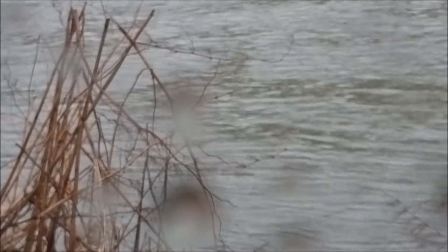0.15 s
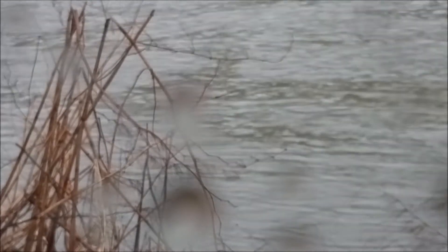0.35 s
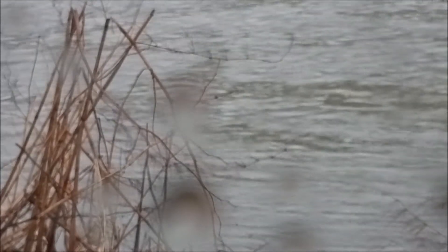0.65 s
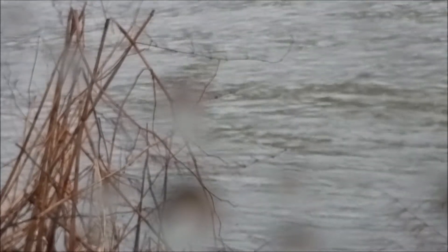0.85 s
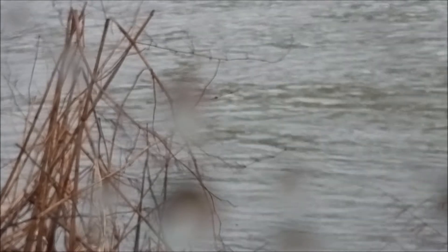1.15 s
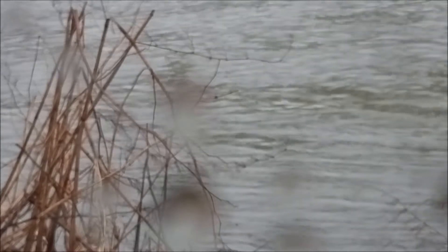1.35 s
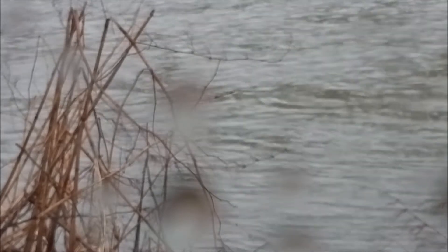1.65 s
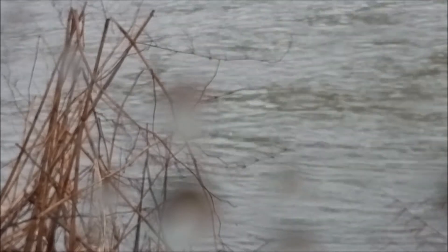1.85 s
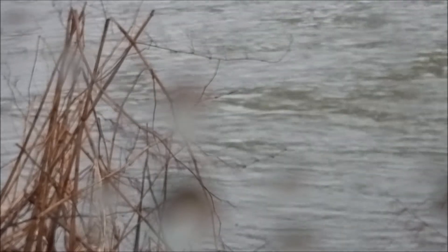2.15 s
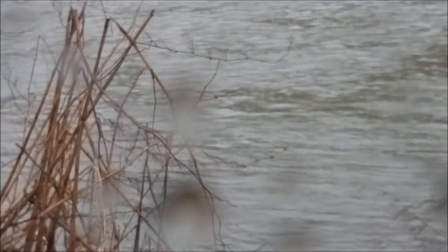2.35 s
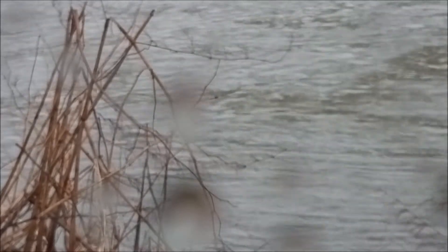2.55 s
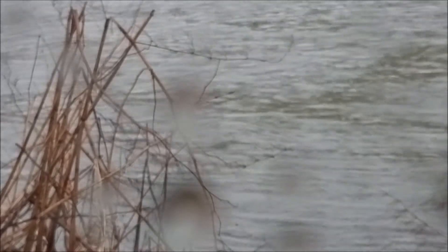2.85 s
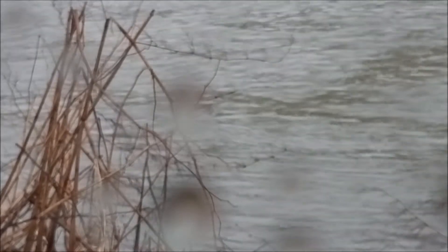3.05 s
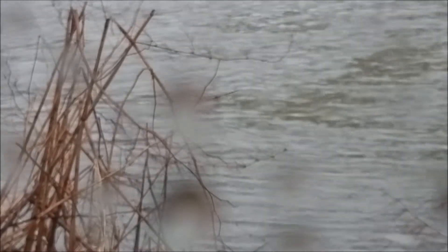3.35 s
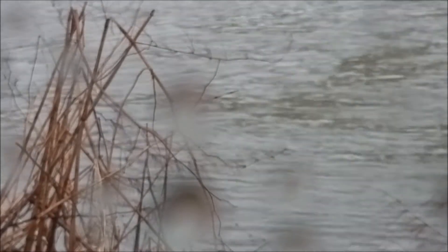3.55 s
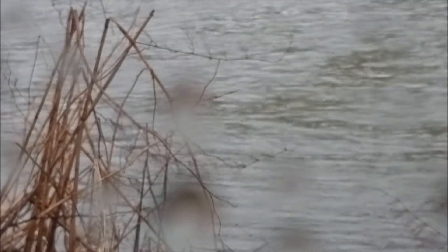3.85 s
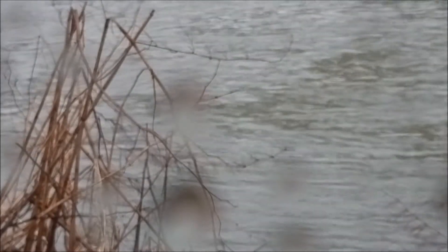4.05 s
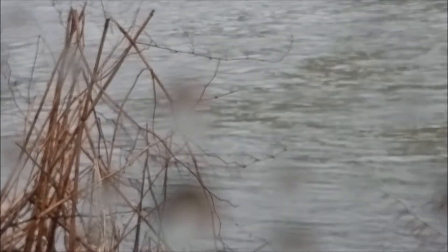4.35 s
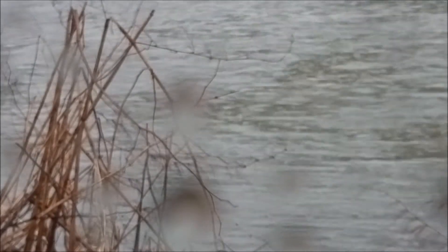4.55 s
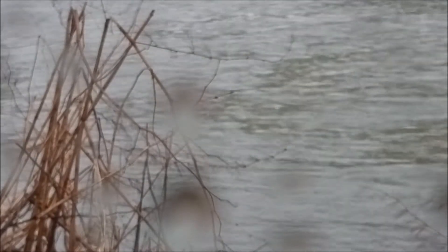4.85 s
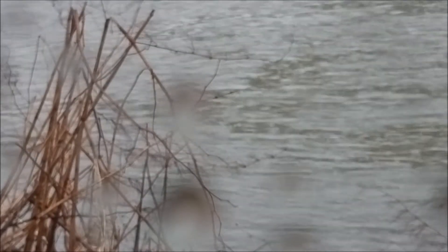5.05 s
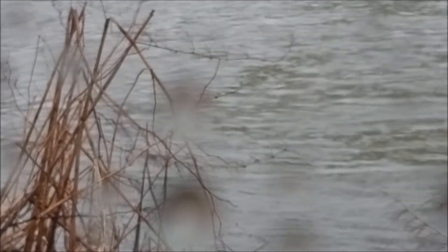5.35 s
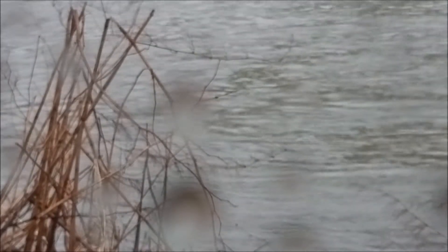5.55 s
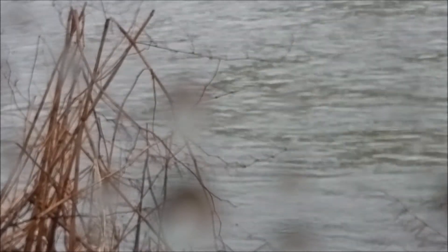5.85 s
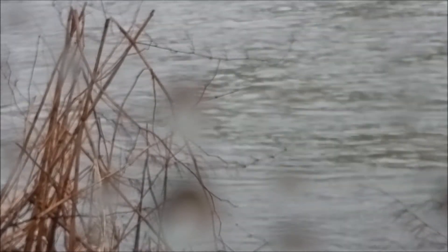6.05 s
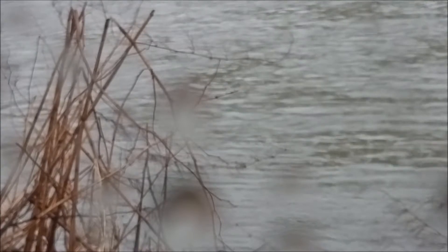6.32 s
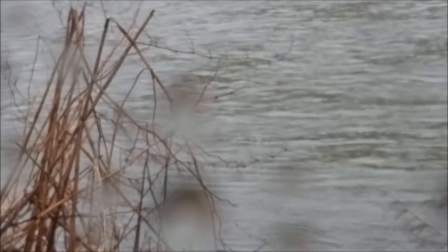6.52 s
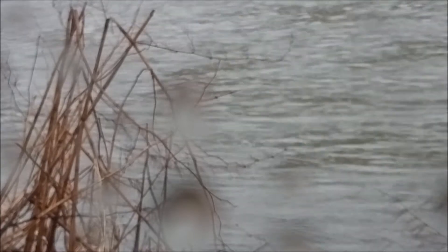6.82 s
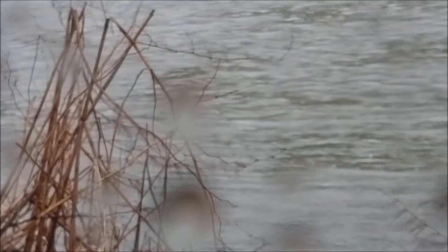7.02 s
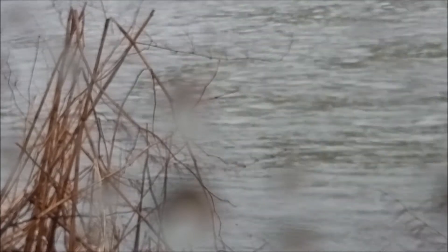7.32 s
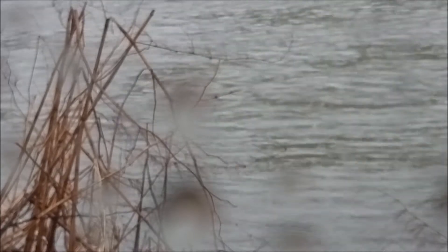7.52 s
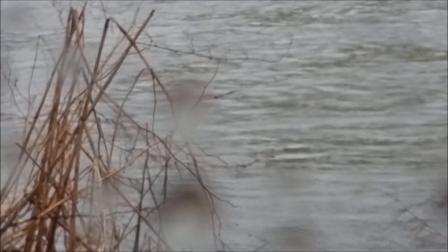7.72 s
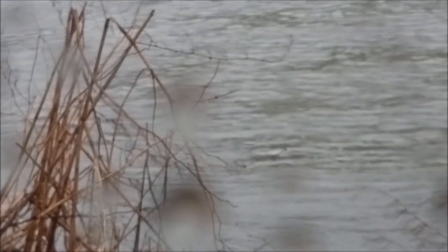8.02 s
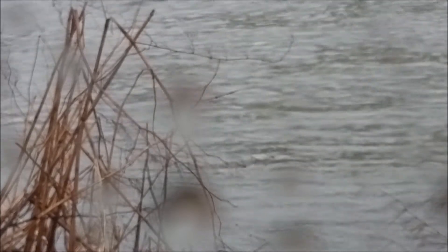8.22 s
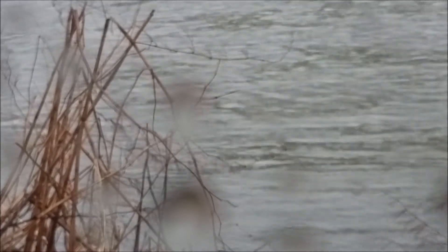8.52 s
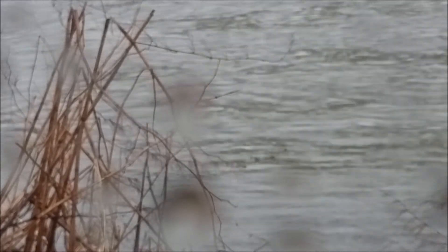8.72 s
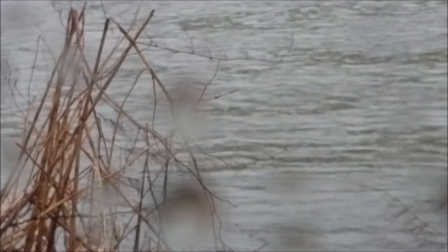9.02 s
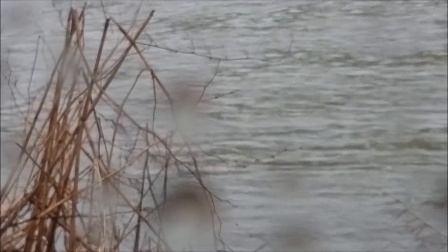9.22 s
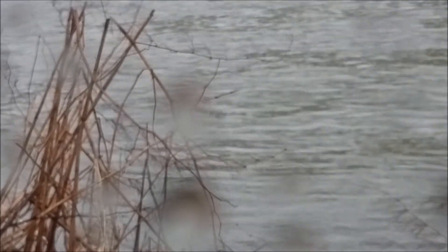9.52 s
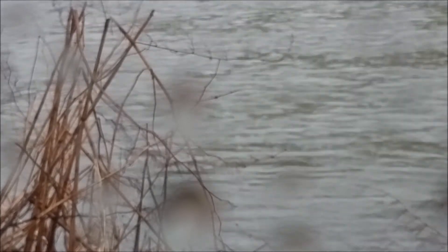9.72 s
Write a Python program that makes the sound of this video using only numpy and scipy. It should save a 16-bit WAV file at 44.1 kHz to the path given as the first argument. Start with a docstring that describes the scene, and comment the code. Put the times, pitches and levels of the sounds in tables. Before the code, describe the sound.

Steady rain patters on an umbrella just above a stereo microphone on a river bank. Hundreds of small drops blend into a dense, low drumming with a wet sizzle. Fat drips thump and splash, round hollow knocks and sharp close ticks stand out irregularly throughout. Behind lies the soft, wide rush of the river and a barely audible low hum.

```python
"""A dense patter of rain on an umbrella just above a stereo microphone is the main sound, on a river bank.
Each drop is an impulse: the taut cloth filters it to a thud, decaying noise makes its ripples,
resonators ring the low modes of the canopy, and coloured noise bursts make its spray.
Heavy drips, round knocks, sharp close ticks and fine droplets stand out of the patter.
Filtered noise makes the river's soft rush; behind it lie a low hum and one brief, very faint high tone."""
import sys
import numpy as np
from scipy import signal
from scipy.fft import rfft, irfft
from scipy.io import wavfile
from scipy.ndimage import uniform_filter1d

SR = 44100
rng = np.random.default_rng(int(sys.argv[2]) if len(sys.argv) > 2 else 0)


def inscribe(sig):
    """Save sig as 16-bit PCM at rate SR to the path in sys.argv[1].

    A 1-D sig is mono; a 2-D sig holds one channel per row.
    Samples are clipped to [-1, 1] before scaling.
    """
    pcm = np.round(np.clip(np.atleast_2d(sig).T, -1, 1) * 32767)
    wavfile.write(sys.argv[1], SR, pcm.astype(np.int16))


N = 435708

# slow swell of the shower: (time [s], relative level [dB])
SHOWER_SWELL = [(0.0, -45), (0.35, -43.5), (0.7, -44.5), (1.4, -41), (1.55, -46), (2.0, -43), (2.5, -41.5),
                (3.3, -43.5), (3.85, -43.5), (4.4, -44), (5.3, -42), (5.7, -44.5), (6.6, -43.5),
                (7.55, -42.5), (8.8, -45.5), (9.88, -42)]


def patter(count=5200, spread_db=2.5, splash_db=7.5, pan_db=1.5):
    """Superposition of random impacts: hundreds of drops a second, each with its own size and splash."""
    times = rng.uniform(0, N / SR, count)
    size, splash, place = np.clip(rng.standard_normal((count, 3)), -2, 2).T
    shower_db = np.interp(np.arange(N) / SR, *np.transpose(SHOWER_SWELL))

    thud_hits = unit(impacts(times, undb(spread_db * size)))
    thuds = cloth(thud_hits, push_db=-7.5, ripple_db=-4.0, ripple_s=0.011, side_db=-2.5, ring_db=8.5)

    drop_db = spread_db * size + splash_db * splash
    left = unit(impacts(times, undb(drop_db + pan_db * place)))
    right = unit(impacts(times, undb(drop_db - pan_db * place)))
    sprays = spray(left, right, crack_s=0.0087, tail_s=0.021, tail_db=4.0)

    # the spray gains 0.65 dB for each dB of the shower
    spray_db = -59 + 0.65 * (shower_db - shower_db.mean())
    return undb(shower_db - 1) * thuds + undb(spray_db) * sprays


# thud spectrum, the part common to both sides: (frequency [Hz], relative level [dB])
THUD_COMMON = [(25, -38), (90, -10.5), (125, -2.5), (220, -3), (450, -0.5), (560, 0), (625, 1.5),
               (760, -2.5), (820, -1.5), (900, -11), (970, -9.5), (1040, -20), (1550, -17.5), (5000, -76)]
# thud spectrum, the part opposed between the sides: (frequency [Hz], relative level [dB])
THUD_OPPOSED = [(30, -31), (170, -8.5), (270, -1.5), (350, -5), (440, -2), (540, -7.5), (700, -0.5),
                (900, -0.5), (1000, -3), (1100, -2), (1180, -4), (1420, -9.5), (5000, -75)]


def cloth(hits, push_db, ripple_db, ripple_s, side_db, ring_db):
    """Impulse response of a membrane: a push, ripples between the ribs, and the ringing canopy."""
    push = undb(push_db) * hits
    motion = push + undb(ripple_db) * scatter(hits, ripple_s)
    # the landing place decides which side leads
    place = rng.uniform(-1, 1, N)
    tilt = push * place + undb(ripple_db) * scatter(hits, ripple_s)
    ring = undb(ring_db) * canopy(hits, ripple_s)
    mid = colour(motion - motion.mean() + ring, THUD_COMMON)
    return stereo(mid, undb(side_db) * colour(tilt, THUD_OPPOSED))


# low modes of the stretched canopy: (frequency [Hz], bandwidth [Hz], relative level [dB])
CANOPY_MODES = [(127.8, 20.4, -3.5), (172.7, 17.8, 1), (266.7, 38.5, -6), (366.3, 21, -4.5)]
# how strongly these modes ring: (time [s], relative level [dB])
RING_STRENGTH = [(0.0, 0), (0.4, 1.5), (0.7, -1.5), (1.1, -2.5), (1.5, -1), (1.8, 0), (2.05, 1.5),
                 (2.35, -1.5), (2.8, 1.0), (3.05, -1.5), (3.45, -1), (3.6, -1), (4.55, 1.5), (4.8, -0.5),
                 (5.4, 0.5), (5.8, 0), (6.55, -0.5), (6.9, -1), (7.1, -0.5), (7.3, 0), (7.65, 0), (7.9, 1),
                 (8.35, -1), (8.5, 1.5), (8.9, 3.0), (9.15, 1), (9.35, 1.5), (9.86, -0.5)]


def canopy(hits, ripple_s):
    """Modal resonance: the wet canopy's low modes ring, each wavering a few percent in pitch."""
    t = np.arange(N) / SR
    ring = 0
    for hz, width_hz, db in CANOPY_MODES:
        resonator = signal.iirpeak(hz, hz / width_hz, SR)
        mode = signal.lfilter(*resonator, scatter(hits, ripple_s))
        # reading the mode at a drifting time bends its pitch
        drift_s = 0.003995 * walk(4)
        ring = ring + undb(db) * np.interp(t + drift_s, t, mode)
    return undb(np.interp(t, *np.transpose(RING_STRENGTH))) * ring


# spray spectrum at the left side: (frequency [Hz], relative level [dB])
LEFT_SPRAY_TONE = [(500, -9), (1400, -0.5), (2300, 1), (3100, -1), (4000, -5), (4900, -8.5), (5600, -19),
                   (6400, -20), (6900, -28), (7700, -27), (14000, -77)]
# spray spectrum at the right side: (frequency [Hz], relative level [dB])
RIGHT_SPRAY_TONE = [(500, -11.5), (1500, 2.5), (1700, 0.5), (1950, 0.5), (2300, 2.5), (2600, 0.5),
                    (2850, 2.5), (3150, 3), (4100, -1.5), (4900, -1.5), (5900, -3.5), (6300, -3),
                    (7000, -13.5), (7900, -25.5), (14000, -32)]


def spray(left_hits, right_hits, crack_s, tail_s, tail_db):
    """Broadband noise bursts: a drop cracks apart, then droplets and wet cloth sizzle."""
    sides = []
    for hits, tone in ((left_hits, LEFT_SPRAY_TONE), (right_hits, RIGHT_SPRAY_TONE)):
        crack = scatter(hits, crack_s)
        tail = undb(tail_db) * scatter(hits, tail_s)
        sides.append(colour(crack + tail, tone))
    return np.array(sides)


# brief gaps in the patter: (time [s], length [s], level change [dB])
PATTER_GAPS = [(0.582, 0.038, -4.5), (0.833, 0.053, -3), (1.095, 0.071, -2), (2.565, 0.032, -10),
               (2.76, .04, -7.5), (2.904, 0.036, -4.5), (4.268, 0.023, -8), (4.652, 0.036, -7),
               (4.82, 0.025, -5), (5.094, 0.077, -5), (5.725, 0.025, -5), (7.578, 0.043, -9.5),
               (7.96, 0.062, -2.5)]


def lulls():
    """Amplitude modulation: the rain's level in dB dips along bell curves as it briefly thins out."""
    t = np.arange(N) / SR
    return sum(db * np.exp(-np.pi * ((t - s) / length_s) ** 2) for s, length_s, db in PATTER_GAPS)


# fat drops that thump the cloth and splash:
# (time [s], relative thud level [dB], relative splash level [dB], mean delay of the fragments [s])
FAT_DROPS = [(0.15, -38.5, -46.5, 0.025), (0.218, -42, -48, 0.011), (0.293, -40, -52, 0.0083),
             (0.419, -41, -64, 0.014), (0.721, -45, -58, 0.016), (0.954, -38.5, -52, 0.011),
             (1.083, -40.5, -46.5, 0.033), (1.319, -45, -51, 0.008), (1.359, -39, -62, 0.025),
             (1.407, -45, -47, 0.017), (1.638, -38.5, -48, 0.028), (1.72, -36.5, -45, 0.026),
             (1.776, -38, -49, 0.02), (1.864, -42.5, -48.5, 0.033), (2.001, -37.5, -46, 0.024),
             (2.131, -38.5, -48, 0.035), (2.238, -42.5, -50, 0.0098), (2.379, -40, -49, 0.012),
             (2.59, -40.5, -50, 0.02), (2.658, -44, -50, 0.012), (2.71, -39.5, -48.5, 0.018),
             (2.854, -44, -47, 0.0099), (3.057, -38, -46.5, 0.034), (3.111, -40, -51, 0.018),
             (3.306, -40, -48, 0.034), (3.424, -39.5, -47, 0.0066), (3.584, -44, -52, 0.0019),
             (3.638, -42, -51, 0.0041), (3.743, -43, -55, 0.0039), (3.957, -36.5, -49, 0.018),
             (4.059, -39, -51, 0.018), (4.36, -44, -57, 0.026), (4.41, -37, -44, 0.016),
             (4.462, -42, -51, 0.016), (4.757, -39, -50, 0.018), (5.481, -45, -66, 0.0077),
             (5.783, -39, -48.5, 0.016), (6.09, -39, -47, 0.013), (6.197, -47, -50.5, 0.003),
             (6.328, -48, -46, 0.011), (6.435, -46, -48, 0.019), (6.681, -50, -58, 0.036),
             (6.807, -37, -47.5, 0.02), (6.839, -44, -52, 0.012), (7.004, -40.5, -48.5, 0.017),
             (7.238, -41, -48, 0.032), (7.608, -47, -61, 0.012), (7.724, -39, -47, 0.037),
             (7.85, -40, -45.5, 0.018), (8.025, -42.5, -51, 0.012), (8.179, -38, -46, 0.039),
             (8.263, -37.5, -45.5, 0.037), (8.351, -36.5, -45.5, 0.037), (8.558, -47, -50, 0.017),
             (8.618, -38.5, -48.5, 0.026), (8.748, -37.5, -43.5, 0.025), (8.834, -40, -53, 0.019),
             (9.049, -37.5, -50, 0.045), (9.111, -39.5, -46, 0.036), (9.207, -39, -58, 0.037),
             (9.6, -40, -51, 0.01), (9.688, -40, -56, 0.006), (9.75, -48, -53, 0.0073)]


def drips():
    """Repeated impulsive excitation: each fat drop drums briefly on the cloth and throws up a splash."""
    s, thud_db, splash_db, fall_s = np.transpose(FAT_DROPS)
    thud_hits = break_up(s, undb(thud_db), fall_s)
    thuds = cloth(thud_hits, push_db=26.0, ripple_db=20.5, ripple_s=0.0067, side_db=-1.0, ring_db=36.5)
    wet = break_up(s, undb(splash_db), fall_s)
    return thuds + undb(25.5) * spray(wet, wet, crack_s=0.0039, tail_s=0.0025, tail_db=-2.5)


def break_up(times, sizes, fall_s, count=16):
    """Energy partition: one blow, then fragments fall back on the cloth, thinning out exponentially."""
    # a drop that scatters for longer than this contact time keeps less energy for its first blow
    contact_s = 0.0014
    share = contact_s / (contact_s + fall_s)
    chance, sway = rng.random((len(times), 2, count)).transpose(1, 2, 0)
    rank = (np.arange(count)[:, None] + chance) / count
    late = times - fall_s * np.log(1 - rank)
    # a fragment meets the swinging cloth on its way up or down
    pieces = sizes * np.sqrt((1 - share) / count) * np.sign(sway - .5)
    return impacts(times, sizes * np.sqrt(share)) + impacts(late.ravel(), pieces.ravel())


# dry knocks of drops on taut cloth: (time [s], relative level [dB], pitch [Hz])
CLOTH_KNOCKS = [(0.218, -27, 593), (0.3945, -31, 570), (0.4202, -32, 550), (0.9583, -44, 460),
                (1.7252, -31, 735), (1.8686, -27, 530), (1.9245, -31.5, 576), (2.0108, -32, 670),
                (2.1458, -26, 520), (2.864, -30, 744), (3.1261, -31, 460), (3.2366, -27.5, 430),
                (3.4317, -32, 550), (4.0609, -27.5, 690), (4.3621, -35, 580), (4.892, -35, 520),
                (5.7993, -28, 530), (6.0965, -31, 530), (6.4396, -29, 597), (6.8444, -27, 556),
                (7.0114, -28, 600), (7.7658, -32, 463), (7.8729, -29, 570), (8.2326, -32, 540),
                (8.638, -36, 457), (9.1362, -28, 520), (9.6898, -28, 510)]


def knocks(blow_db=-6.5, length_s=0.0021, ring_db=8):
    """Damped oscillation: a drop on taut cloth gives one round knock, and the canopy shivers after it."""
    s, db, _ = np.transpose(CLOTH_KNOCKS)
    rows = [(at, knock_db + blow_db, hz, length_s, 0) for at, knock_db, hz in CLOTH_KNOCKS]
    blows = taps(rows, rough=0.033, apart=0.56)
    hits = impacts(s, undb(db + ring_db))
    return blows + cloth(hits, push_db=-23, ripple_db=1, ripple_s=0.0062, side_db=-3, ring_db=14)


# sharp drops that spatter right above the microphone:
# (time [s], relative level [dB], centre frequency [Hz], nominal length [s], left minus right [dB])
CLOSE_DROPS = [(0.151, -47, 3100, 0.0032, -2), (0.296, -41.0, 4000, 0.0017, -3),
               (0.324, -45.5, 3420, 0.0027, -4), (0.488, -48, 3700, 0.002, -2),
               (0.674, -43, 3800, 0.0022, -2), (1.259, -50, 3200, 0.0027, 5),
               (1.406, -51, 3400, 0.0037, -5), (1.433, -45, 3300, 0.0031, -6),
               (1.4438, -43, 3480, 0.0028, -3), (1.4765, -42, 4200, 0.0018, -8),
               (1.726, -53, 3200, 0.0044, 2), (1.906, -42.5, 3100, 0.0043, 1),
               (2.052, -44, 3500, 0.002, -4), (2.1105, -44, 3200, 0.0031, -3),
               (2.115, -44, 3100, 0.0028, -1), (2.413, -46, 3700, 0.0016, -2),
               (2.597, -46.0, 3600, 0.0034, -9), (2.8164, -42.5, 3500, 0.0022, -5),
               (2.921, -43, 2880, 0.0024, -3), (3.096, -46.5, 3700, 0.0035, 1),
               (3.1104, -43.0, 3600, 0.0035, -4), (3.1211, -50, 3200, 0.0041, -6),
               (3.286, -41, 3380, 0.0026, -4), (3.348, -44.5, 4000, 0.0021, -4),
               (3.395, -42.5, 3080, 0.0032, -2), (3.4693, -37, 4000, 0.0015, 2),
               (3.573, -47, 3500, 0.0019, -3), (3.6, -47, 3200, 0.0029, -3),
               (3.614, -47.5, 3200, 0.0035, -5), (3.71, -44.5, 3200, 0.0027, -2),
               (3.963, -51, 2900, 0.0032, 3), (4.06, -42, 3120, 0.0034, 1), (4.1659, -51, 3300, 0.0027, 0),
               (4.1879, -40.5, 3280, 0.0022, -5), (4.225, -44.5, 3000, 0.0016, 0),
               (4.362, -42, 3460, 0.002, -1), (4.409, -42.5, 3400, 0.0046, -7),
               (4.647, -44.5, 3400, 0.0021, -2), (4.6954, -40.5, 3770, 0.003, -4),
               (4.786, -46, 3400, 0.0025, 0), (5.083, -41, 3800, 0.0026, 0),
               (5.268, -45.0, 3500, 0.0022, 0), (5.2978, -49, 4000, 0.0028, 1),
               (5.782, -41, 2960, 0.0026, 4), (5.8474, -42.5, 3650, 0.0027, -5),
               (5.948, -45, 3200, 0.0016, 4), (5.9643, -38, 3900, 0.0018, -5),
               (6.097, -41.5, 3540, 0.0022, -3), (6.449, -44, 3380, 0.0022, -5),
               (6.491, -38.5, 3070, 0.0034, -3), (6.626, -38.5, 4030, 0.0017, -8),
               (6.685, -39.0, 3300, 0.0027, -4), (6.712, -43.5, 3300, 0.0025, -2),
               (6.7922, -46.5, 3500, 0.0021, -4), (7.109, -44.5, 3700, 0.0035, -3),
               (7.163, -46, 3700, 0.0012, 2), (7.2513, -47.0, 3600, 0.0035, -1),
               (7.2973, -44.5, 3480, 0.0023, 6), (7.344, -43.5, 3580, 0.0017, 2),
               (7.441, -42, 3300, 0.0028, -7), (7.539, -42.5, 3700, 0.0019, -6),
               (7.847, -48.5, 2860, 0.0046, -2), (7.991, -42, 3880, 0.0021, -5),
               (8.185, -41.0, 3500, 0.0019, -6), (8.193, -47, 3600, 0.003, -2),
               (8.2201, -48, 3100, 0.0025, 1), (8.4068, -43.0, 3000, 0.003, -1),
               (8.492, -42, 3400, 0.0029, -4), (8.52, -43.5, 3500, 0.0023, -4),
               (8.5765, -47, 3500, 0.0019, -2), (8.6215, -49, 3100, 0.0036, -1),
               (8.63, -45.5, 3300, 0.0025, -2), (8.743, -42.5, 3600, 0.0031, -3),
               (8.7967, -43, 3800, 0.0022, -14), (8.8335, -44, 3700, 0.0037, -6),
               (8.8453, -43.0, 3100, 0.0025, -1), (8.992, -41, 3700, 0.0016, -2),
               (9.1175, -46, 3300, 0.0035, 1), (9.194, -48, 4000, 0.0017, -9),
               (9.213, -43, 3500, 0.0027, 1), (9.29, -47, 3100, 0.0035, -2),
               (9.349, -42.5, 3200, 0.0019, -4), (9.595, -43.5, 3930, 0.0017, -9),
               (9.747, -40, 4100, 0.0014, -3)]


def ticks(click_db=-11, click_db_per_hz=0.0035, sizzle_db=10, thud_db=8.0, wetness=1.7):
    """Transient radiation: a spat, a click stronger at high pitch, a sizzle growing with length, a thud."""
    s, db, hz, length_s, pan_db = np.transpose(CLOSE_DROPS)
    click_hits = impacts(s, undb(db + click_db + click_db_per_hz * (hz - hz.mean())))
    click = colour(click_hits, [(1500, -25), (6000, -2), (9000, 5), (15000, -3)])

    wet = (length_s / length_s.mean()) ** (wetness / 2)
    left = impacts(s, wet * undb(db + pan_db / 2))
    right = impacts(s, wet * undb(db - 0.72 * pan_db / 2))
    sizzle = spray(left, right, crack_s=0.0057, tail_s=0.01, tail_db=4.0)

    # the cloth gives way 3 ms after the splash
    thud_hits = impacts(s + 0.003, undb(db + thud_db))
    thuds = cloth(thud_hits, push_db=6.5, ripple_db=7, ripple_s=0.019, side_db=3.0, ring_db=15.5)
    bursts = spats(CLOSE_DROPS, octaves=0.55, lag_s=0.000506, core=.5, skirt=0.37)
    return click + undb(-1.03) * bursts + undb(sizzle_db) * sizzle + thuds


def spats(rows, octaves, lag_s, core, skirt, size=768):
    """Dispersion: water bursts in a wide-band crackle, its lows lag_s an octave behind its highs."""
    # drops near this level and above open with a clean snap; its size is set against the crackle
    snap_from_db, snap_size = -39.5, 5.1
    out, t = np.zeros((2, N + size)), (np.arange(size) - size // 2) / SR
    grid = np.maximum(np.arange(size // 2 + 1) * SR / size, 1)
    top = 1 / np.sqrt(1 + (grid / 6800) ** 20)
    for s, db, hz, length_s, pan_db in rows:
        height = np.log2(grid / hz)  # octaves above the centre
        delay = np.exp(2j * np.pi * lag_s * np.cumsum(height) * SR / size)
        band = np.exp(-.5 * (height / octaves) ** 2)
        # a sharp core inside a softer, longer skirt
        swell = np.exp(-np.pi / 2 * (t / (core * length_s)) ** 2)
        swell += skirt * np.exp(-(t / length_s - .5) ** 2)
        burst = rng.standard_normal((2, size)) * swell
        burst[:, size // 2] += snap_size * min(undb(db - snap_from_db) ** 2, 1)
        burst = irfft(rfft(burst) * band * top * delay)
        # longer bursts carry more energy
        burst *= np.sqrt(length_s * SR / np.sum(burst ** 2, axis=1, keepdims=True))
        pan = unit(undb([[pan_db / 2], [-pan_db / 2]]))
        start = int(np.clip(s * SR, 0, N))
        out[:, start:start + size] += undb(db) * pan * burst
    return out[:, size // 2:size // 2 + N]


def droplets(count=1800):
    """Short oscillations: fine droplets tap lightly; the high ones are weaker and lie to the right."""
    when, size, pitch, place, length = rng.random((count, 5)).T
    # the cube makes strong droplets rare; the highest pitch is 8.5 dB weaker than the lowest
    db = -56 + 9.5 * size ** 3 - 8.5 * pitch
    hz = 1378 * 2 ** (1.936 * pitch)  # lowest pitch [Hz], span above it [octaves]
    length_s = 0.0017 * (.5 + length)
    pan_db = 14 * (place - .5) - 8 * pitch ** 3
    return taps(np.transpose([when * N / SR, db, hz, length_s, pan_db]), rough=0.082, apart=1.87)


def taps(rows, rough, apart, size=384):
    """Windowed oscillation: a few cycles of cloth motion with a slightly rough phase, offset between sides."""
    # rows: (time [s], level [dB], pitch [Hz], length [s], left minus right [dB])
    out, t = np.zeros((2, N + size)), (np.arange(size) - size // 2) / SR
    for s, db, hz, length_s, pan_db in rows:
        wobble = rough * np.cumsum(rng.standard_normal((2, size)), axis=1)
        offset = rng.uniform(0, 2 * np.pi) + apart * rng.standard_normal((2, 1))
        phase = 2 * np.pi * hz * t + wobble + offset
        swell = np.sqrt(2) * np.exp(-np.pi / 2 * (t / length_s) ** 2)
        gain = undb([[db + pan_db / 2], [db - pan_db / 2]])
        start = int(np.clip(s * SR, 0, N))
        out[:, start:start + size] += gain * swell * np.sin(phase)
    low_pass = signal.butter(6, 6500, fs=SR, output="sos")
    return signal.sosfilt(low_pass, out[:, size // 2:size // 2 + N])


# spectrum of the river's rush: (frequency [Hz], relative level [dB])
RIVER_TONE = [(20, -36), (40, -3), (90, 1.5), (160, 0), (650, 3.5), (1100, -12.5), (3000, -13.5),
              (5500, -23.5), (9000, -50.5)]


def river():
    """Diffuse turbulent noise: a wide, gently swelling rush, its bass alike on both sides."""
    high_pass = signal.butter(1, 600, "high", fs=SR, output="sos")
    side = signal.sosfilt(high_pass, colour(noise(), RIVER_TONE))
    level_db = -52.5 + 1.0 * walk(3.0)
    return undb(level_db) * stereo(colour(noise(), RIVER_TONE), side)


# faint hum, about which pitch and level drift: (mean frequency [Hz], mean level [dB])
HUM_TONES = [(40, -74.5), (61.7, -70.5)]


def hum():
    """Narrow-band tones: low sines whose pitch and level drift slightly."""
    total = 0
    for hz, db in HUM_TONES:
        level = np.sqrt(2) * undb(db + 2.7 * walk(0.88))
        phase = 2 * np.pi * np.cumsum(hz + 0.623 * walk(2.05)) / SR
        total = total + level * np.sin(phase)
    return total


def whistle():
    """Pure tone: one brief, very faint, thin high sine with softened ends."""
    start_s, end_s, hz, db = 9.095, 9.265, 9074, -81.5
    t = np.arange(N) / SR
    gate = uniform_filter1d(1. * ((t > start_s) & (t < end_s)), size=600)
    return np.sqrt(2) * undb(db) * gate * np.sin(2 * np.pi * hz * t)


def undb(db):
    """Logarithmic level: decibels to amplitude gain."""
    return 10 ** (np.asarray(db) / 20)


def unit(x):
    """Power normalisation: scale to rms 1."""
    return x / np.sqrt(np.mean(x ** 2))


def noise():
    """White noise: equal mean power at all frequencies, rms 1."""
    return rng.standard_normal(N)


def walk(rate):
    """Smoothed random process: a drift of rms 1 with about `rate` turns a second."""
    k = int(SR / rate)
    steps = np.repeat(rng.standard_normal(N // k + 2), k)
    return unit(uniform_filter1d(steps, k)[:N])


def colour(x, points, size=4096):
    """Minimum-phase filtering through (frequency [Hz], level [dB]) points; keeps white noise's power."""
    hz, db = np.transpose(points)
    grid = np.maximum(np.arange(size // 2 + 1) * SR / size, 1)
    cepstrum = irfft(np.log(undb(np.interp(np.log(grid), np.log(hz), db))))
    # folding the cepstrum makes the filter causal
    cepstrum[1:size // 2] *= 2
    cepstrum[size // 2 + 1:] = 0
    response = irfft(np.exp(rfft(cepstrum)))
    return signal.oaconvolve(x, response / np.linalg.norm(response))[:N]


def impacts(times, sizes):
    """Impulsive excitation: one impulse for each drop."""
    return np.bincount(np.clip(times * SR, 0, N - 1).astype(int), sizes, N)


def scatter(hits, decay_s):
    """Exponential energy decay: each impact becomes its own dying noise burst of the same energy."""
    keep = np.exp(-2 / (decay_s * SR))
    energy = signal.lfilter([1 - keep], [1, -keep], hits ** 2 + 1e-18)
    return noise() * np.sqrt(energy)


def stereo(mid, side):
    """Sum and difference: left and right from their common and opposed parts."""
    return np.array([mid + side, mid - side])


def scene():
    """Superposition of all sources; the fine droplets thin out less than the patter."""
    lull_db = lulls()
    rain = undb(lull_db) * patter() + undb(lull_db / 2) * droplets()
    return rain + drips() + knocks() + ticks() + river() + hum() + whistle()


# spectrum of the microphone's hiss: (frequency [Hz], relative level [dB])
HISS_TONE = [(100, 0), (8000, -0.91), (13000, -0.16), (15500, -0.46)]


def record(dry):
    """Transducer noise and band limit: the microphone adds a faint, even hiss; the top is cut."""
    hiss = undb(-69.5) * np.array([colour(noise(), HISS_TONE) for _ in dry])
    low_pass = signal.ellip(10, .2, 70, 15750, fs=SR, output="sos")
    return signal.sosfilt(low_pass, dry + hiss)


dry = scene()
out = record(dry)
inscribe(out)
```